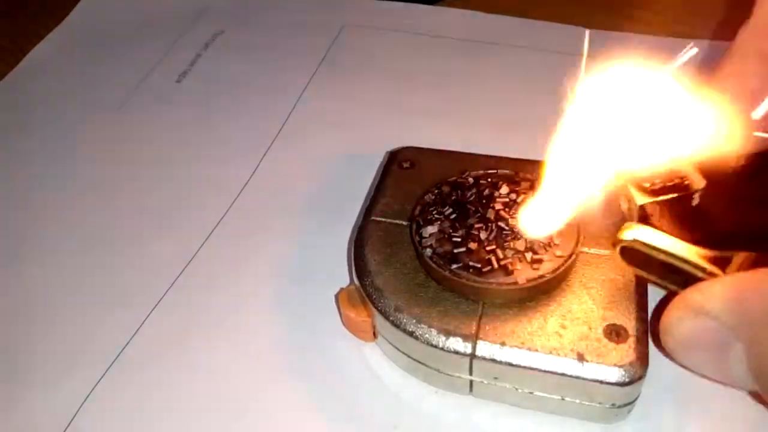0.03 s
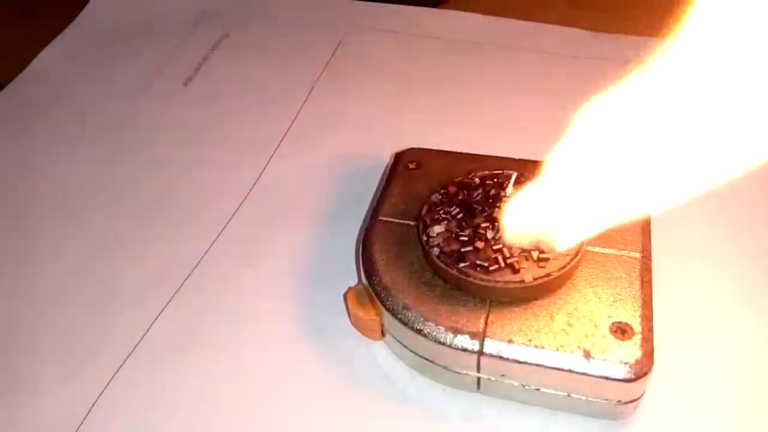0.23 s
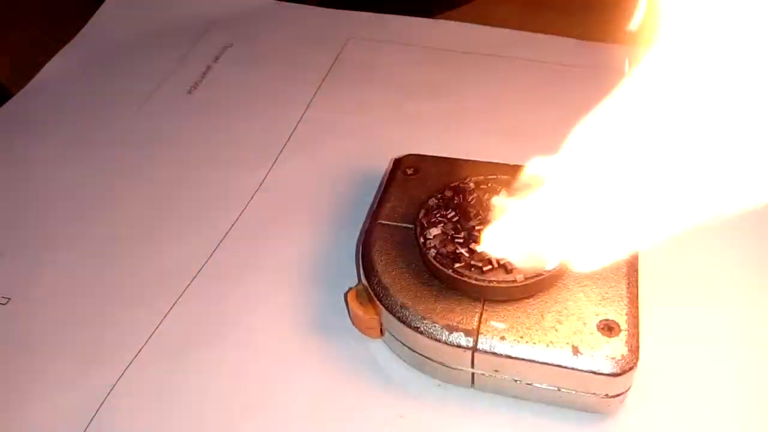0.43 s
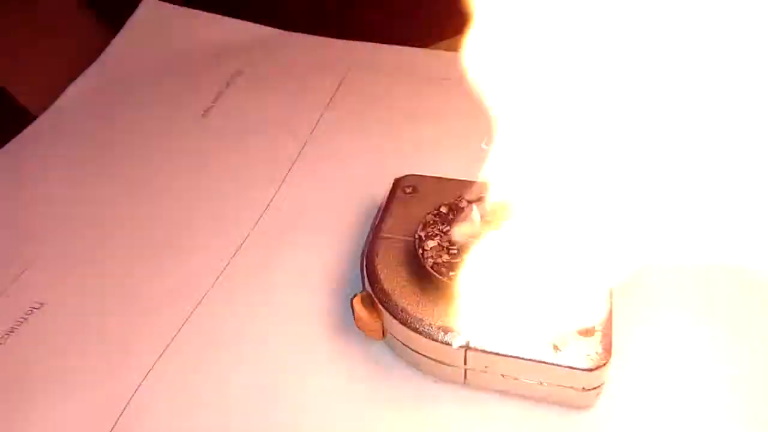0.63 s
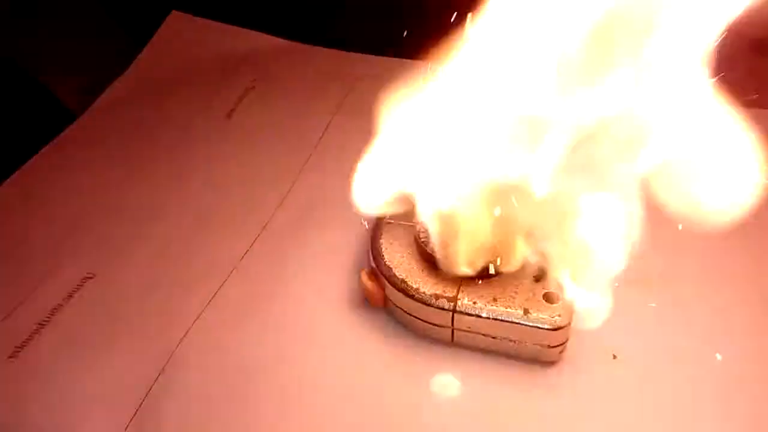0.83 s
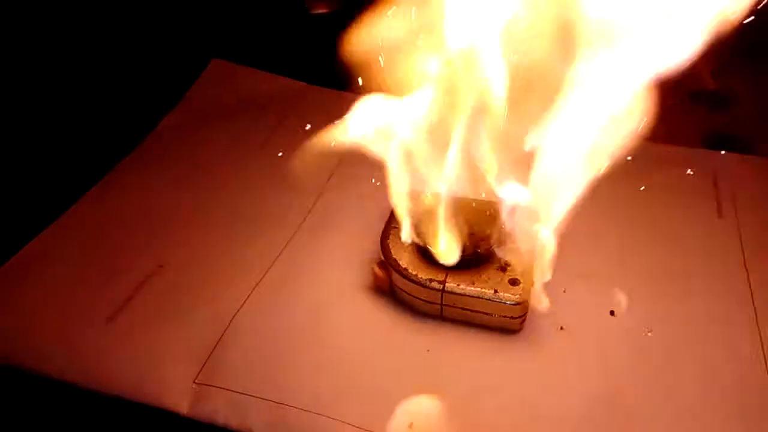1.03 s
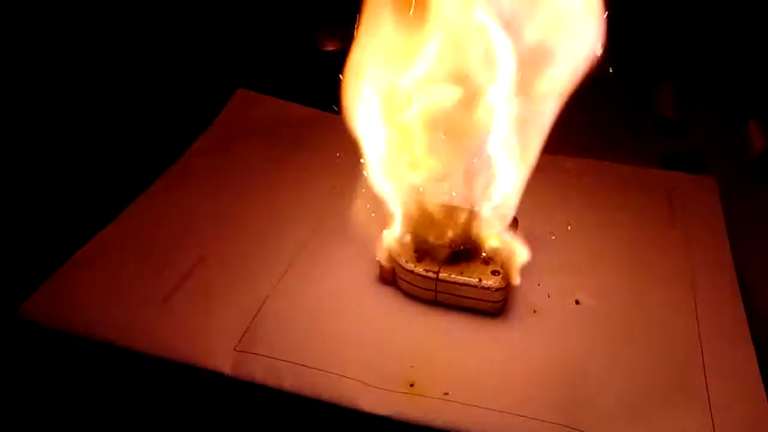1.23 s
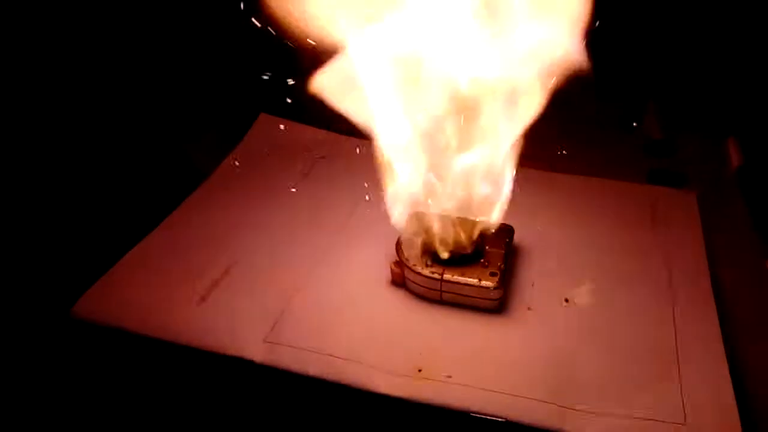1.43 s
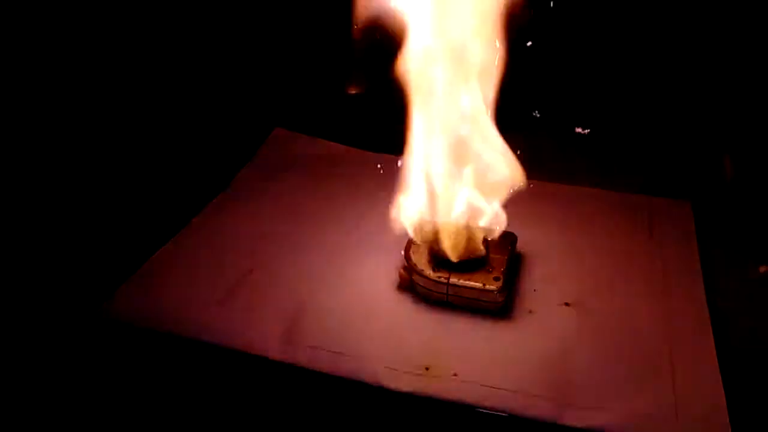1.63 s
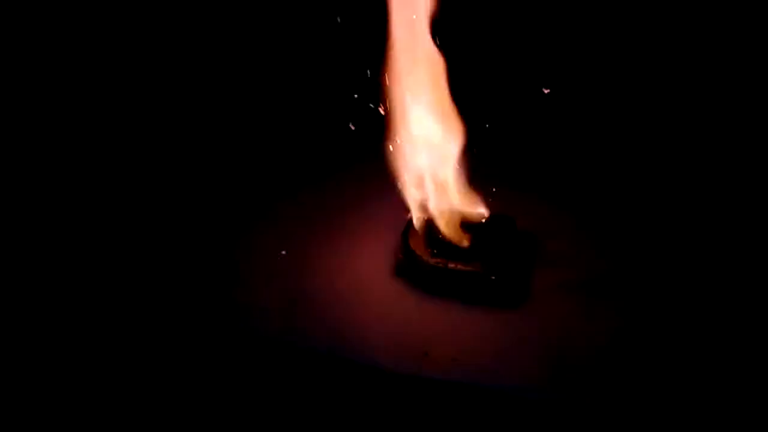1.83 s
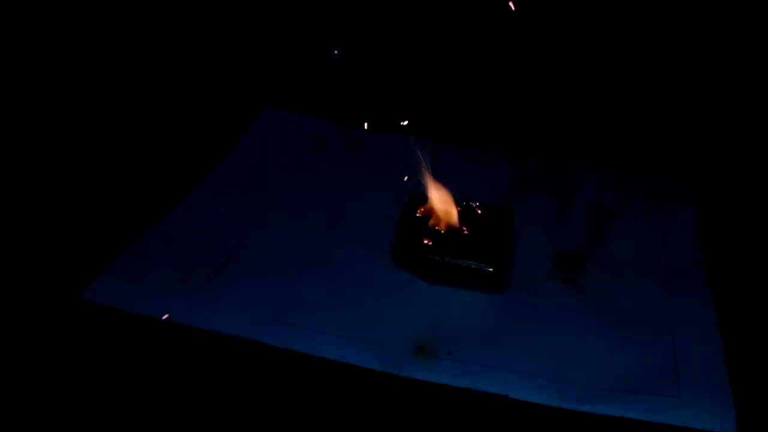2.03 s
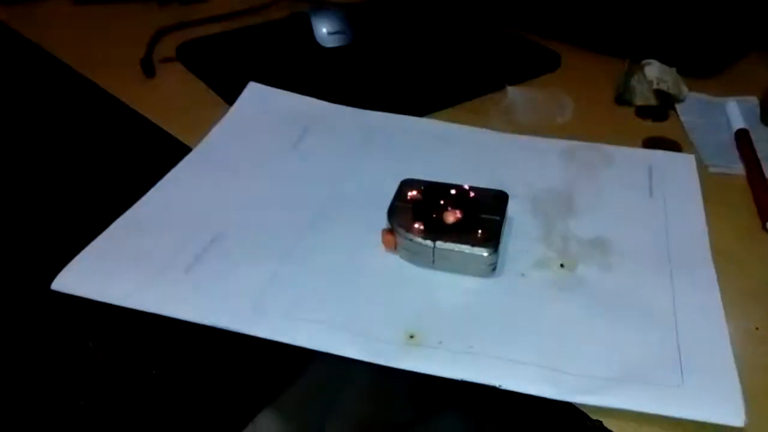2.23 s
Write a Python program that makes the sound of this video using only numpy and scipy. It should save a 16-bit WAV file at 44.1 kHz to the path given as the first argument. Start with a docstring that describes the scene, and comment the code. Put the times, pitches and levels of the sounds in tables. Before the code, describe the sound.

Burning powder hisses and sizzles close by in a quiet room. The hiss starts faint, and a loud, briefly ringing lighter click comes at 0.2 seconds. The sizzle then swells, joined from about 0.5 seconds by a low, fluttering flame whoosh, both strongest around 0.8 seconds. The whoosh eases while the hiss holds until about 1.7 seconds, then both fade, dying out by roughly 2.2 seconds.

```python
"""On a metal case on a table, a small heap of powder granules is lit and burns off in two seconds.
The lighter's trigger snaps back and rings briefly. Countless tiny gas jets hiss and sizzle,
and the flame flares with a fluttering roar, then dies with a hollow sound in a quiet room.
The microphone is close and draws back, which shifts the colour of the hiss reflected by the table."""
import sys
import numpy as np
from scipy import signal
from scipy.fft import rfft, irfft
from scipy.io import wavfile
from scipy.ndimage import uniform_filter1d

SR = 44100
rng = np.random.default_rng(int(sys.argv[2]) if len(sys.argv) > 2 else 0)


def master_out(mix):
    """Clip the mix to full scale and print it as 16-bit PCM to the path in sys.argv[1]."""
    frames = np.transpose(np.atleast_2d(mix))
    ceiling = np.clip(frames, -1, 1)
    pcm = np.round(ceiling * 32767).astype(np.int16)
    wavfile.write(sys.argv[1], SR, pcm)


N = 101429
TIME = np.arange(N) / SR
FREQ_HZ = np.arange(N // 2 + 1) * SR / N


def gas_hiss():
    """Tiny gas jets hiss and single granules pop, heard directly and bounced off the table."""
    # strength of the burning: time_s, level_db
    burning = [(0, -53.5), (.09, -53), (.18, -47), (.3, -43.5), (.42, -43), (.56, -40.5), (.66, -41.5),
               (.77, -39.5), (.95, -40.5), (1.15, -41.5), (1.27, -42.5), (1.45, -42.5), (1.68, -43.5),
               (1.85, -48.5), (2.02, -52.5), (2.15, -65.5), (2.3, -63)]
    # microphone position: time_s, echo_delay_ms, left_echo_gain, right_echo_gain, left_minus_right_db
    microphone = [(0, 0.46, 0.097, .3, 1.5), (.3, 0.42, 0.19, 0.26, 2), (.55, 0.45, .12, .1, 0),
                  (.68, .46, .15, .15, 2), (.85, 0.63, .12, .12, 0), (1.05, 0.43, .05, .2, 1.5),
                  (1.25, 0.38, 0.1, 0.19, -1.5), (1.65, 0.33, 0.12, 0.067, 1), (1.87, 0.34, 0.15, .2, -2),
                  (2.3, 0.31, 0.14, 0.17, 2)]
    # tone colour of the hiss: pitch_hz, left_db, right_db
    hiss_colour = [(80, -32.5, -28), (300, -13, -20.5), (700, -11, -10), (970, -12.5, -15.5),
                   (1650, -11.5, -22), (1970, -8.5, -16), (2720, -8.5, -12.5), (3100, -12, -23.5),
                   (4090, -3.5, -12.5), (4770, 3, -13.5), (5430, -0.5, -7.5), (5730, -6.5, -6.5),
                   (6390, -6, -1), (7146, -14, -15.5), (7700, -23, -23.5), (8850, -51.5, -49.5),
                   (12000, -33.5, -43.5), (14120, -33.5, -59.5)]
    # two dips in that colour glide as flame and microphone move: time_s, pitch_hz, left_db, right_db
    low_dip = [(.1, 2690, -3, -5), (.42, 2800, -20, -2), (.65, 2740, -19, -1.5), (.9, 3070, -9, 1),
               (1.03, 3030, 0.5, 5), (1.55, 3350, -7, -8), (2.1, 3500, 2, -3.5)]
    high_dip = [(.45, 7700, -4.5, -6), (.6, 6900, -8, -33), (.68, 5720, -4, -15), (.85, 6130, -8, -18),
                (1.05, 6330, -3.5, -10.5), (1.25, 6000, 2, -2)]
    # boost or cut of the faint fizz at the top of the hiss: time_s, change_db
    fizz = [(0, -3), (.3, 1.5), (.57, 2), (.67, -6.5), (.76, 6.5), (.88, -3), (1.13, 3), (1.27, -1.5),
            (1.38, 5.5), (1.6, 3), (1.82, -6), (2.3, -4.5)]
    burn_db, = over_time(burning)
    fizz_db, = over_time(fizz)
    delay_ms, *echo_gains, pan_db = over_time(microphone)

    peak_pops_per_s = 2500
    popping = rng.random(N) < peak_pops_per_s * from_db(.5 * (burn_db - burn_db.max())) / SR
    pop_db = 0.5 * np.minimum(rng.exponential(1, N), 4)
    pops = popping * from_db(pop_db) * rng.choice([-1, 1], N)
    gas = stereo_noise(likeness=0.58) + from_db(-8.5) * unit_level(pops)

    delayed = np.array([np.interp(TIME - delay_ms / 1000, TIME, side) for side in gas])
    hiss = coloured(gas + np.array(echo_gains) * delayed, hiss_colour)
    hiss = cut_dip(hiss, low_dip, width_hz=210)
    hiss = cut_dip(hiss, high_dip, width_hz=590)
    hiss = hiss + (from_db(fizz_db) - 1) * band(hiss, low_hz=9500, high_hz=SR)
    hiss = wavering(hiss)
    sputter_db = 0.47 * drift(hz=45)
    return hiss * pan(pan_db) * from_db(burn_db + sputter_db + 1.5)


def fierce_jets():
    """The fiercest jets add narrow bands of noise that swell and sink."""
    # one jet a row: peak_s, spread_s, pitch_hz, width_hz, level_db, left_minus_right_db
    jets = [(.55, 0.032, 6000, 900, -51, -5), (0.809, .12, 4540, 950, -44, 13.5),
            (1.04, 0.035, 3400, 1000, -53.5, 10), (1.55, 0.029, 4000, 300, -53.5, 13)]
    out = 0
    for peak_s, spread_s, hz, width_hz, db, pan_db in jets:
        jet = band(stereo_noise(likeness=0.43), hz - width_hz / 2, hz + width_hz / 2)
        out = out + unit_level(jet) * bell_curve(TIME, peak_s, spread_s) * from_db(db) * pan(pan_db)
    return out


def flame_roar():
    """The swirling flame rumbles and flutters, deeper once the whole heap has caught."""
    # size of the flame, heard as loudness: time_s, level_db
    flame_size = [(0, -60.5), (.11, -58.5), (.25, -60), (.38, -54.5), (.46, -50), (.58, -44.5),
                  (.625, -46.5), (.685, -39), (.79, -38.5), (.86, -36), (.97, -39), (1.06, -43),
                  (1.12, -39), (1.19, -47.5), (1.33, -48), (1.42, -45), (1.5, -49), (1.64, -48),
                  (1.76, -54), (1.85, -54), (1.9, -63.5), (2.13, -67.5), (2.22, -80)]
    # tone colour of the roar: pitch_hz, level_db
    roar_colour = [(25, -23), (45, -17), (75, -10.5), (135, 2), (180, -3), (230, -4.5), (380, -15),
                   (500, -15), (860, -28.5), (1500, -29.5), (3000, -56)]
    flame_db, = over_time(flame_size)
    roar = steadied(coloured(stereo_noise(likeness=0.99), roar_colour))
    catching_s, caught_s = 0.46, 0.59
    bass_db = np.interp(TIME, [catching_s, caught_s], [-5.5, 1.5])
    roar = roar + (from_db(bass_db) - 1) * band(roar, low_hz=0.84, high_hz=111)
    flutter_db = 0.5 * drift(hz=26)
    return roar * from_db(flame_db + flutter_db - 1)


def lighter_snap():
    """Each contact of the trigger rings briefly, with a gritty edge and a short room echo."""
    # the trigger creeps, lets go, grazes, then hits its stop: start_s, level_db, tilt_db_per_octave
    contacts = [(.1728, -41, 3), (.199, -19, 6), (.2027, -25, 6), (.2043, -1.6, 0)]
    # tones the lighter rings with: pitch_hz, left_db, right_db
    tones = [(1760, -7.5, -19), (2148, -6, -13.5), (2662, -7.5, -21.5), (3594, -3, -29), (4310, 4, -14),
             (4946, 4.5, -8), (6123, -21, -0.5), (6898, -26.5, -8), (7525, -20.5, -21.5)]
    # tone colour of the grit and the echo: pitch_hz, left_db, right_db
    snap_colour = [(60, -39.5, -41), (200, -22, -24), (600, -23.5, -25), (1250, -18.5, -22.5),
                   (1690, -7, -4), (2100, -3, -6), (3100, -14, -24), (4030, -6.5, -11), (3940, 6, -4),
                   (5300, -5, -17), (5730, -9, 0), (6740, -5.5, 5), (7400, -18, -8.5), (8200, -31.5, -15),
                   (10000, -26.5, -25), (15000, -32, -35.5)]
    grit = coloured(stereo_noise(likeness=0.097), snap_colour)
    echo = coloured(stereo_noise(likeness=0.097), snap_colour)
    rise_s, grit_decay_s, echo_rise_s, echo_fade_s = 0.001, 0.0034, 0.027, 0.13
    delay_s = np.array([[0], [0.065e-3]])   # the snap reaches the right side later
    out = np.zeros((2, N))
    for start_s, db, tilt_db in contacts:
        age = np.maximum(TIME - start_s - delay_s, 0)
        swell = (age / rise_s * np.exp(1 - age / rise_s)) ** 2
        for k, (hz, left_db, right_db) in enumerate(tones):
            tone = (-1) ** k * np.sin(2 * np.pi * hz * age)
            tone_db = np.array([[left_db], [right_db]]) + db + tilt_db * np.log2(hz / 4500)
            out += from_db(tone_db) * swell * tone
        out += from_db(db - 9) * grit * np.minimum(age / rise_s, 1) * np.exp(-age / grit_decay_s)
        echo_fade = from_db(-60 * (age - echo_rise_s) / echo_fade_s)
        out += from_db(db - 32) * echo * np.minimum(age / echo_rise_s, 1) * echo_fade
    return out


def dying_flame():
    """The last small flame sounds hollow: its noise rings around two low pitches."""
    # resonances of the flame: pitch_hz, width_hz, level_db
    resonances = [(680, 77, 0.5), (872, 77, -2.5)]
    peaks = sum(from_db(db) / (1 + (2 * (FREQ_HZ - hz) / width) ** 2) for hz, width, db in resonances)
    hollow = unit_level(irfft(rfft(stereo_noise(likeness=0.63)) * peaks, N))
    return hollow * from_db(-64.5) * bell_curve(TIME, centre=2.028, spread=0.072)


def last_hiss():
    """A faint, bright hiss on the right after the flame is out."""
    # tone colour of this hiss: pitch_hz, left_db (the right side uses the same colour)
    bright_colour = [(1000, -36), (3300, -16), (5000, -7), (6200, 5.5), (7200, -5.5), (9000, -13),
                     (15000, -13)]
    start_s, rise_s, decay_s = 2.2, 0.054, 0.067
    age = TIME - start_s
    swell = np.clip(age / rise_s, 0, 1) * np.exp(-np.maximum(age - rise_s, 0) / decay_s)
    return coloured(stereo_noise(likeness=0.19), bright_colour) * swell * from_db(-60.5) * pan(-21)


def room_rumble():
    """The room's quiet, steady background noise."""
    # tone colour of the room: pitch_hz, level_db
    room_colour = [(25, -35.5), (80, -18.5), (135, 9.5), (190, -7.5), (260, -14), (500, -7), (1000, -19),
                   (3000, -20), (6000, -13.5), (8500, -38.5), (15000, -32.5)]
    return from_db(-63.5) * coloured(stereo_noise(likeness=0.21), room_colour)


def wavering(hiss):
    """As the jets move, each part of the treble rises and sinks on its own."""
    edges_hz = np.geomspace(800, 16000, 15)
    bands = (band(hiss, low, high) for low, high in zip(edges_hz, edges_hz[1:]))
    return hiss + sum((from_db(1.39 * drift(hz=8.7)) - 1) * part for part in bands)


def cut_dip(noise, path, width_hz):
    """Turn a gliding band of pitches down (or up, where the path's decibels are positive)."""
    freq_hz, frame_s, frames = signal.stft(noise, SR, nperseg=512)
    time_s, *columns = np.transpose(path)
    centre_hz, *change_db = [np.interp(frame_s, time_s, column) for column in columns]
    gain = from_db(np.array(change_db)[:, None] * bell_curve(freq_hz[:, None], centre_hz, width_hz))
    return signal.istft(frames * gain, SR)[1][:, :N]


def steadied(noise):
    """Take the slow random swells out of a noise and keep its fast flutter."""
    return noise / np.sqrt(uniform_filter1d(np.mean(noise ** 2, axis=0), size=2200) + 1e-12)


def stereo_noise(likeness):
    """White noise whose two sides are unrelated (likeness 0), the same (1) or in between."""
    shared = np.sqrt(likeness) * rng.standard_normal(N)
    return shared + np.sqrt(1 - likeness) * rng.standard_normal((2, N))


def coloured(noise, colour):
    """Give stereo noise a tone colour (one for both sides or one each), at level 1."""
    hz, *sides = np.transpose(colour)
    gain = from_db([np.interp(np.log(FREQ_HZ + 1), np.log(hz), db) for db in sides])
    return unit_level(irfft(rfft(noise) * gain, N))


def band(noise, low_hz, high_hz):
    """The part of a noise between two pitches."""
    hz = FREQ_HZ + 1
    return irfft(rfft(noise) / (1 + (low_hz / hz) ** 20) / (1 + (hz / high_hz) ** 20), N)


def drift(hz):
    """A random wobble of typical size 1, mostly slower than hz."""
    return unit_level(irfft(rfft(rng.standard_normal(N)) / (1 + (FREQ_HZ / hz) ** 2), N))


def bell_curve(x, centre, spread):
    """A smooth hump of height 1."""
    return np.exp(-.5 * ((x - centre) / spread) ** 2)


def over_time(rows):
    """Join a table's timed points with straight lines: one curve for each value column."""
    time_s, *columns = np.transpose(rows)
    return [np.interp(TIME, time_s, column) for column in columns]


def pan(left_minus_right_db):
    """Left and right gains for a level difference."""
    return from_db(np.array([[.5], [-.5]]) * left_minus_right_db)


def from_db(db):
    """Turn decibels into a gain to multiply by."""
    return 10 ** (np.asarray(db) / 20)


def unit_level(x):
    """Scale a signal so its average power is 1."""
    return x / np.sqrt(np.mean(x ** 2) + 1e-20)


def scene():
    """All the sounds together at the microphone."""
    fire = gas_hiss() + fierce_jets() + flame_roar() + dying_flame()
    return fire + lighter_snap() + last_hiss() + room_rumble()


def record(dry):
    """The snap overloads the microphone's input, and the highest treble is cut."""
    cutoff_hz = 16300
    treble_cut = signal.cheby2(20, 80, cutoff_hz, fs=SR, output="sos")
    return signal.sosfilt(treble_cut, np.clip(dry, -1, 1))


dry = scene()
out = record(dry)
master_out(out)
```